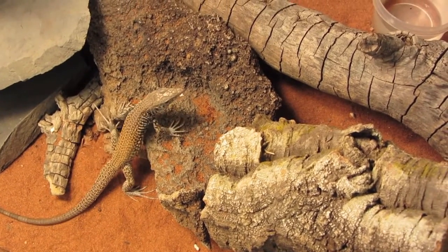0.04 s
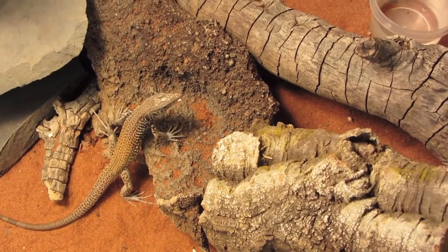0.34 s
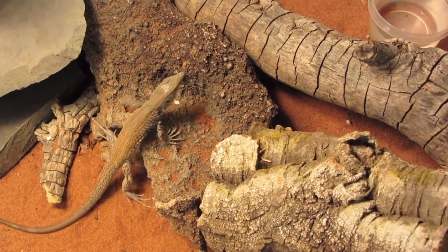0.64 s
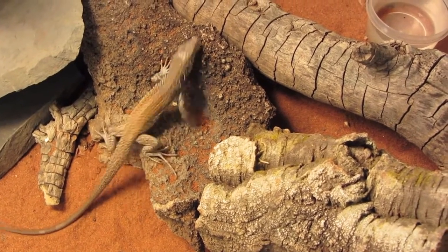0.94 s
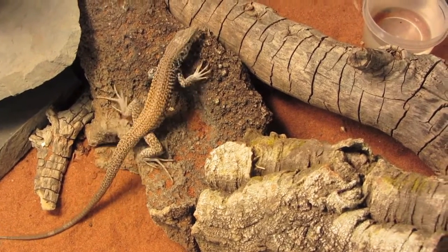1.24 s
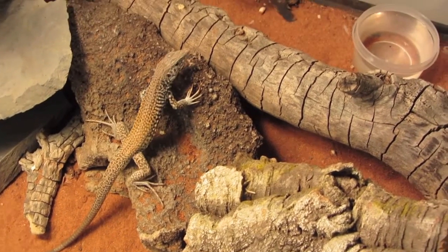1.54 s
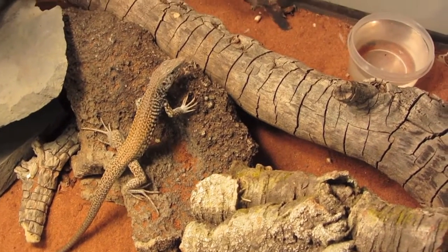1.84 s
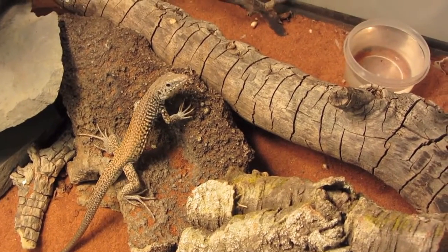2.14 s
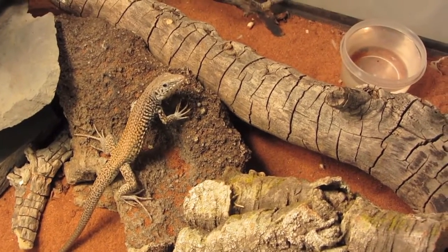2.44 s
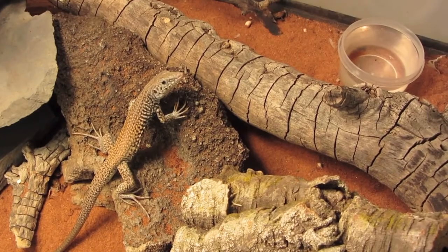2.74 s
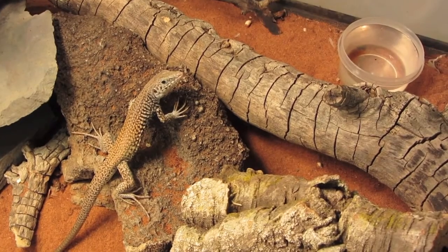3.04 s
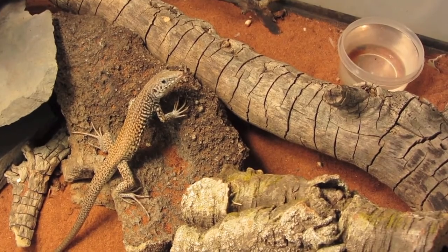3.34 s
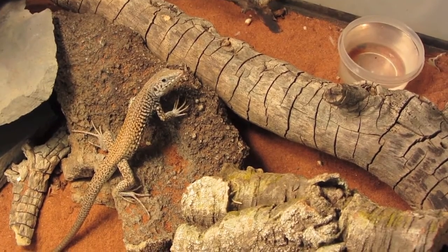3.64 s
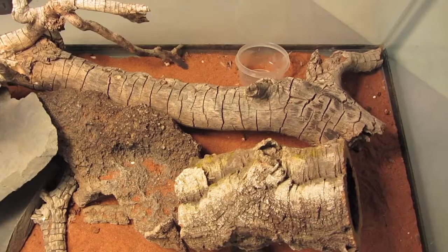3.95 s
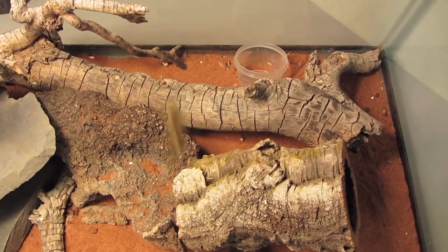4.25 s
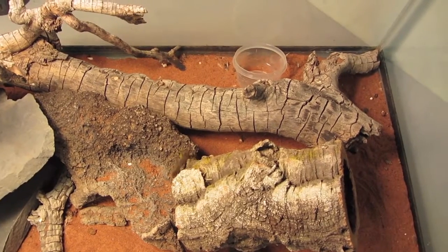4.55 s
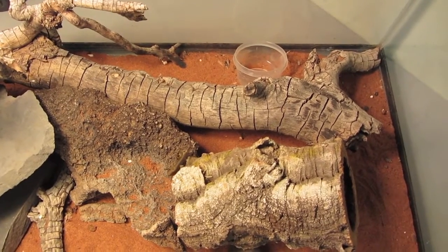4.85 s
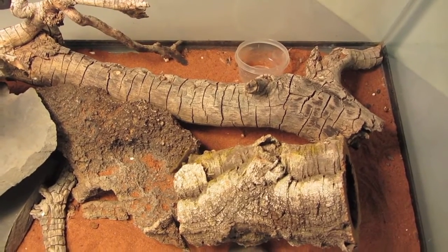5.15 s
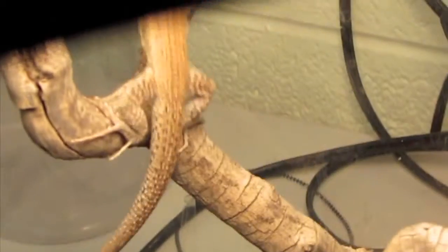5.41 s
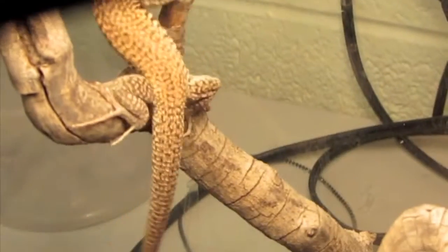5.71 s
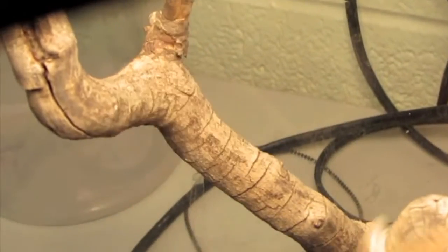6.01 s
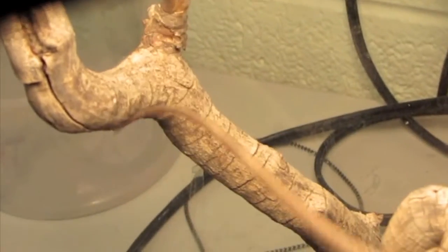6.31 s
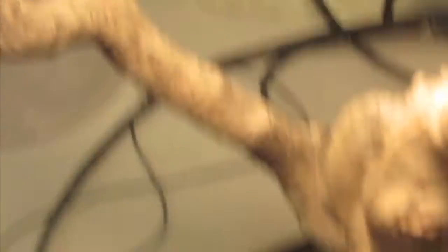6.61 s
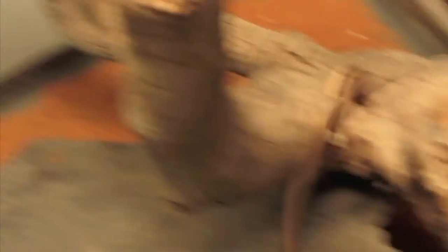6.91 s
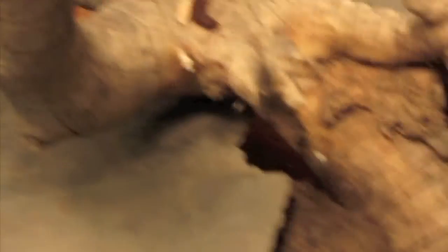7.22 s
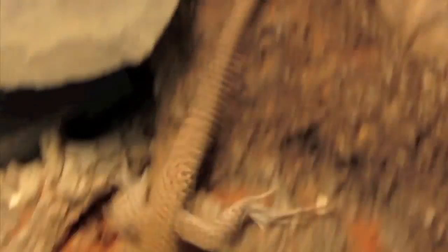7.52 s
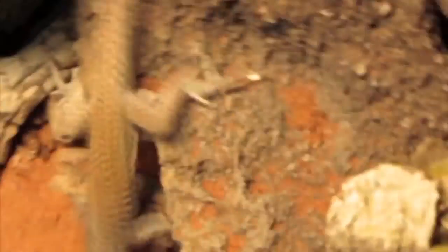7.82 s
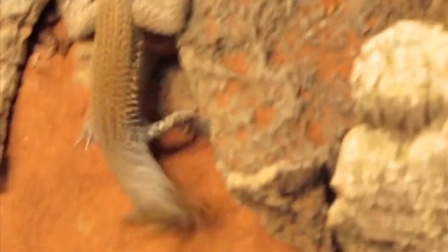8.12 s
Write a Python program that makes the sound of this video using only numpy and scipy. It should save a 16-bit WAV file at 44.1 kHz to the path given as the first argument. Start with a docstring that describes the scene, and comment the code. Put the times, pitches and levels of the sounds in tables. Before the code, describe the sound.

A small room hums, then a lizard scrambles over bark with sharp claw clicks and rasping, and a branch knocks against its glass tank.

```python
"""A small, hard room humming with ventilation, a stereo microphone close to a glass terrarium.
Inside, a lizard scrambles over soil, cork bark and branches: claws tick, scales rasp, hollow wood
knocks, stone and metal clink, and a branch bangs on the tank and sets the panes ringing.
Further off, feeder crickets chirp faintly with their wings. The sound fades out and back in twice."""
import sys
import numpy as np
from scipy import signal
from scipy.fft import rfft, irfft, next_fast_len
from scipy.io import wavfile
from scipy.ndimage import uniform_filter1d

SR = 44100
rng = np.random.default_rng(int(sys.argv[2]) if len(sys.argv) > 2 else 0)


def master(y):
    """Save y as 16-bit WAV."""
    cut = np.clip(np.atleast_2d(y).T, -1, 1)
    pcm = np.round(cut * 32767)  # scale
    wavfile.write(sys.argv[1], SR, pcm.astype(np.int16))


N = 360297
TIME = np.arange(N) / SR
TAIL = np.arange(SR * 3 // 4) / SR

# how alike the two sides of the microphone are: frequency_hz, correlation
LIKENESS = [(60, 0.93), (130, 0.65), (300, 0.32), (700, 0.3), (1400, 0.19), (3100, 0.081), (7000, 0.051)]
# modes of the stone slab: pitch_hz, level_db, t60_s
STONE_MODES = [(568.5, -0.5, 0.13), (2430, -2, 0.076), (2950, -8.5, 0.13), (3490, -11, 0.079),
               (3526, 0.5, 0.12), (3820, -7.5, .09), (5300, -12.5, 0.089), (7200, -15, .06)]
# feet landing on bark: start_s, claw_db, grit_db, t60_s, knock_db
BARK_FOOTFALLS = [(0.8988, -44.5, -17, .11, -60), (3.9844, -49, -9.5, .14, -62),
                  (4.0392, -46, -15, 0.12, -62), (4.373, -18, -12.5, 0.042, -31.5),
                  (4.4413, -27, -17, 0.083, -35), (4.5409, -32.5, -26, 0.16, -41),
                  (4.6177, -42.5, -19.5, .17, -51), (5.2115, -43, -16.5, 0.08, -62),
                  (5.449, -24, -18.5, 0.14, -29), (6.0344, -47, -16, 0.15, -30.5),
                  (6.128, -34, -15, .09, -30), (6.2403, -41, -14, 0.12, -50), (6.355, -22.5, -28, .12, -44),
                  (6.7032, -33.5, -20.5, 0.16, -45), (6.7481, -29.5, -24, .12, -32),
                  (6.8338, -34.5, -24, 0.049, -49), (6.8684, -35.5, -15, 0.36, -48),
                  (6.9442, -28.5, -13, .06, -36), (6.982, -34.5, -11.5, .06, -48),
                  (7.0508, -23, -22.5, 0.15, -31.5), (7.2237, -27, -16.5, 0.048, -61),
                  (7.317, -25, -20, 0.22, -33), (7.5613, -26, -24, .12, -49),
                  (7.5959, -27.5, -14.5, .11, -38), (7.633, -19.5, -20.5, 0.17, -25.5)]
# claws gripping the hard upper branch: start_s, level_db
BRANCH_GRIPS = [(5.386, -35.5), (5.485, -33.5), (5.524, -30.5), (5.549, -35), (5.575, -32), (5.749, -33),
                (5.824, -26), (5.851, -26), (5.891, -22.5), (5.966, -34.5)]


def amp(db):
    """Decibels to gain."""
    return 10 ** (np.asarray(db) / 20)


def unit(x):
    """Scale to rms 1."""
    return x / np.sqrt(np.mean(x ** 2) + 1e-20)


def along(points, hz):
    """Read (frequency_hz, value) points on a log axis."""
    f, v = np.transpose(points)
    return np.interp(np.log(hz + 1), np.log(f + 1), v)


def filtered(x, response):
    """Filter x by a gain that depends on frequency."""
    n = x.shape[-1]
    m = next_fast_len(n + 4096)
    return irfft(rfft(x, m) * response(np.fft.rfftfreq(m, 1 / SR)), m)[..., :n]


def coloured(pair, spectrum):
    """Two unrelated signals become left and right with this spectrum, rms 1, alike in the bass."""
    def response(hz):
        turn = np.arccos(np.clip(along(LIKENESS, hz), -1, 1)) / 2
        return amp(along(spectrum, hz)) * np.array([np.cos(turn), np.sin(turn)])
    mid, side = filtered(pair, response)
    return unit(np.array([mid + side, mid - side]))


def noise(spectrum, size):
    """Stereo noise of rms 1."""
    return coloured(rng.standard_normal((2, size)), spectrum)


def panned(x, balance):
    """Lean each frequency to one side."""
    return filtered(x, lambda hz: amp(np.outer([.5, -.5], along(balance, hz))))


def dying(x, t60s, damping):
    """Each frequency of x dies in its own t60 divided by damping."""
    hz, t, spectra = signal.stft(x, SR, nperseg=256)
    decay = amp(-60 * t * damping / along(t60s, hz)[:, None])
    return signal.istft(spectra * decay, SR, nperseg=256)[1][:, :x.shape[1]]


def add(track, start_s, sound):
    """Mix a sound into the track."""
    part = track[:, max(round(start_s * SR), 0):][:, :sound.shape[-1]]
    part += sound[..., :part.shape[1]]


def tones(rows):
    """Unsteady tones, each a narrow band of noise."""
    return sum(amp(db) * unit(filtered(rng.standard_normal(N), lambda f: np.exp(-((f - hz) / width)**2)))
               for hz, width, db in rows)


def ring(modes, damping):
    """Struck modes die in t60 / damping; strengths vary by blow, phases by side of the microphone."""
    hz, db, t60 = np.transpose(modes)[:, :, None]
    spread = 1 - np.clip(along(LIKENESS, hz), 0, 1)
    phase = spread * rng.normal(0, 1.56, (2, len(hz), 1))
    fall = amp(db + rng.normal(0, 1.0, hz.shape) - 60 * TAIL * damping / t60) / np.linalg.norm(amp(db))
    attack = 1 - np.exp(-TAIL / 0.0024)
    return (fall * np.sin(2 * np.pi * hz * TAIL + phase)).sum(1) * np.sqrt(2) * attack


def resonant(modes):
    """The spectrum of a body with these resonances: frequency_hz, level_db."""
    f = np.geomspace(20, SR / 2, 1500)
    body = sum((-1) ** k * amp(db) * 1j * f * width / (hz * hz - f * f + 1j * f * width)
               for k, (hz, width, db) in enumerate(modes))
    return np.transpose([f, 20 * np.log10(np.abs(body) + 1e-9)])


def varied(spectrum, ripple_db):
    """Every spot of bark has small resonances of its own."""
    f = np.geomspace(100, SR / 2, 130)
    ripple = ripple_db * np.clip(rng.standard_normal(len(f)), -2, 2)
    return np.transpose([f, along(spectrum, f) + ripple])


def snap(t, t60):
    """Envelope of a claw catching: a brief crack and a crumbling decay."""
    crumble = amp(3 * uniform_filter1d(rng.standard_normal(len(t)), 64) * np.sqrt(64))
    return crumble * (amp(-60 * np.abs(t) / max(t60, .01)) + 0.21 * amp(-60 * np.abs(t) / 0.023))


def grains(rate_hz, t60_s):
    """Random tiny contacts that wander between a few spots, each with its own ring."""
    spots = 6
    hits = rng.random((spots, N)) < rate_hz / spots / SR
    strength = amp(3 * np.minimum(rng.exponential(size=(spots, N)), 3))
    knots = np.arange(0, N / SR, .04)
    pressure = np.array([np.interp(TIME, knots, row) for row in rng.random((spots, len(knots))) ** 3])
    t = TAIL[:SR // 10]
    rings = rng.standard_normal((spots, 2, len(t))) * amp(-60 * t / t60_s)
    return signal.oaconvolve((hits * strength * pressure)[:, None], rings, axes=2).sum(0)[:, :N]


def room(x):
    """The tail of a small hard room, longest in the bass."""
    decay = [(200, 0.93), (1000, 0.7), (2700, 0.28), (3600, 0.18), (6000, 0.14), (14000, 0.22)]  # frequency_hz, t60_s before damping
    tail = dying(rng.standard_normal((2, len(TAIL))), decay, damping=0.68) * (1 - np.exp(-TAIL / 0.0023))
    return signal.fftconvolve(x, tail / np.linalg.norm(tail[0]), axes=1)[:, :N]


def ventilation():
    """Rumble, air hiss and mains hum all round; from 3.87 s the background sounds different, without the 84 Hz
    hum and the fan tones."""
    # moving air, early and later: frequency_hz, density_db
    rumble, rumble_later = [(20, -24), (40, -24), (66, -8), (82, -13.5), (100, 2.5), (125, -1.5),
                            (155, -2.5), (188, -9), (215, -27.5), (300, -35.5), (600, -102)], [(20, -23), (40, -26.5), (66, -11.5), (80, -1.5), (102, -5.5),
                                            (128, 1), (152, -3.5), (188, -13), (215, -24.5), (300, -31),
                                            (600, -74.5)]
    air, air_later = [(130, -44), (220, -5.5), (350, 0.5), (400, -3.5), (540, -5), (630, -12), (720, -8),
                      (960, -14), (1700, -16.5), (3200, -20), (3900, -27), (6600, -28.5), (9800, -39.5),
                      (12000, -52)], [(130, -48), (220, -18.5), (293, -2), (450, -8.5), (510, -9), (600, -13),
                                   (820, -17.5), (1300, -24), (2500, -27), (3950, -36.5), (5200, -34),
                                   (9800, -43), (12500, -62)]
    # machine tones: pitch_hz, width_hz, level_db
    fan = [(350.4, 20, -58.5), (1326, 39, -63.5), (1506, 14, -71)]
    blower = [(84.1, 6.2, -36.5)]
    mains = [(119.9, 0.45, -37.5)]
    balance = [(60, -6), (190, -5), (380, 3), (700, -0.5), (8000, .5)]  # at the microphone: frequency_hz, left_minus_right_db
    early = amp(-31.5) * noise(rumble, N) + amp(-46.0) * noise(air, N) + tones(fan) + tones(blower)
    later = amp(-31) * noise(rumble_later, N) + amp(-47.0) * noise(air_later, N)
    return panned(tones(mains) + np.where(TIME < 3.87, early, later), balance)


def crickets():
    """Distant songs swell stroke by stroke; a wing stroke is a slightly rising tone with a weak octave."""
    songs = [(2.267, 3, .075, 6030, -53), (2.726, 4, .066, 5900, -58.5), (3.304, 2, .072, 6100, -48),
             (3.77, 8, .063, 6040, -53), (3.9, 2, 0.059, 5100, -59.5)]  # start_s, stroke_count, period_s, final_pitch_hz, final_level_db
    stroke_s, warm_up_hz, warm_up_db = 0.034, 130, 2  # a song starts lower and softer
    out, u = np.zeros((2, N)), np.linspace(0, 1, int(stroke_s * SR))
    glide = 1 - 0.03 * np.exp(-u / 0.29)
    for s, count, period, hz, db in songs:
        for k, soft in enumerate(np.linspace(1, 0, round(count))):
            # uneven file teeth roughen the pitch
            teeth = 1 + .006 * rng.standard_normal() + .1 * rng.standard_normal(len(u))
            phase = 2 * np.pi * np.cumsum((hz - warm_up_hz * soft) * teeth * glide) / SR
            stroke = np.abs(np.sin(np.pi * u)) ** 0.6 * (np.sin(phase) + amp(-24.0) * np.sin(2 * phase))
            add(out, s + k * period, amp(db - 0.5 - warm_up_db * soft) * stroke)
    return out


def clinks():
    """The stone slab and a thin metal fitting ring lightly as the lizard passes."""
    # light contacts: start_s, level_db
    stone_taps = [(.9, -47.5), (4.441, -42), (4.542, -52), (4.619, -55), (7.634, -65)]
    metal_taps = [(6.131, -39.5), (6.869, -45), (6.945, -36)]
    metal_modes = [(2944, -1, 0.28), (3550, 0, 0.093), (5600, -1, 0.07), (7515, -10, 0.16)]  # pitch_hz, level_db, t60_s before damping
    out = np.zeros((2, N))
    for taps, modes in (stone_taps, STONE_MODES), (metal_taps, metal_modes):
        for s, db in taps:
            add(out, s, amp(db) * ring(modes, damping=0.84))
    return out


def wood_knocks():
    """Wood sounds hollow underfoot and as it drops back; harder contact brings out the upper modes."""
    wood = [(190.8, 1, 0.39), (317, -5, 0.5), (447, 2.5, 0.16), (469, 4, 0.21), (567, 2, 0.21),
            (754.5, -7.5, 0.23), (843, -14, 0.26), (1084, -0.5, 0.059), (1210, -17, 0.089),
            (1373, -23.5, 0.18)]  # free modes: pitch_hz, level_db, t60_s before damping
    drops = [(5.469, -27.5, -2), (5.985, -22, -17.5), (6.16, -29.5, 2), (6.3, -26.5, -2),
             (6.372, -24.5, .5), (7.083, -26.5, 3.5), (7.903, -24, 1)]  # loose branch on the tank floor: start_s, level_db, tilt_db_per_octave
    foot_tilt_db = 5.5
    underfoot = [(s, db, foot_tilt_db) for s, *_, db in BARK_FOOTFALLS]
    out = np.zeros((2, N))
    for s, db, tilt_db in [*underfoot, *drops]:
        modes = [(hz, level + tilt_db * np.log2(hz), t60) for hz, level, t60 in wood]
        add(out, s, amp(db) * ring(modes, damping=1.32))  # bedded wood dies faster
    return out


def tank_blows():
    """Branch and stone knock on the tank: a clatter, a thud of the frame, ringing panes and a clink."""
    blows = [(6.4533, -14, -20.5, -27.5, -55, 0.77), (6.463, -25.5, -48, -45, -55, 0.78),
             (7.874, -20, -28.5, -29, -20, 4.5), (7.892, -24, -25, -54, -46, 2.5),
             (7.9354, -26.5, -18.5, -48, -22.5, 2.76)]  # start_s, clatter_db, thud_db, glass_db, stone_db, damping
    clatter_spectrum = [(120, -37), (200, -11), (273, -19), (558, -18), (659, -27.5), (763, -9.5),
                        (1320, -17), (1710, -11), (2020, -14.5), (2170, -9), (3190, -14), (4350, -21.5),
                        (5420, -13.5), (14300, -35.5), (16000, -84)]  # frequency_hz, density_db
    clatter_decay = [(200, 0.97), (1000, 0.34), (2700, 0.21), (4000, 0.12), (8000, 0.093), (15000, 0.053)]  # frequency_hz, t60_s before damping
    # modes of the tank: pitch_hz, level_db, t60_s before damping
    frame = [(138.3, -10, 0.37), (170, 5.5, 0.48), (190.7, 0, 1), (349, -7.5, 0.7), (436, -6, 0.55),
             (560, -6.5, 0.4)]
    panes = [(680, -31, 1), (910, -15, 0.77), (1053, 4, 0.65), (1173, 4, 0.61), (1740, 11, 0.31),
             (2264, -8.5, 0.24), (2330, -7, 0.95), (3020, 14, 0.19), (3830, -13, 0.3), (4290, -18, 0.23),
             (4600, -9, 0.18), (4940, -10, 0.28)]
    out = np.zeros((2, N))
    for s, clatter_db, thud_db, glass_db, stone_db, damping in blows:
        clatter = amp(clatter_db) * dying(noise(clatter_spectrum, len(TAIL)), clatter_decay, damping)
        thud = amp(thud_db) * ring(frame, damping)
        glass = amp(glass_db) * ring(panes, damping)
        stone = amp(stone_db) * ring(STONE_MODES, damping=1)
        add(out, s, clatter + thud + glass + stone)
    return out


def soil_steps():
    """A foot lands flat on soil: a soft tap that dies at once."""
    steps = [(1.402, -39), (5.454, -27), (6.75, -30.5), (7.083, -48), (7.319, -33)]  # start_s, level_db
    soil = [(250, -10), (480, 6), (580, -2), (700, -21), (1090, -0.5), (1400, -13), (2000, -11.5),
            (3500, -45)]  # frequency_hz, level_db
    out, t = np.zeros((2, N)), TAIL[:SR // 4]
    attack = 1 - np.exp(-t / 0.00079)
    for s, db in steps:
        add(out, s, amp(db - 60 * t / 0.12) * attack * noise(soil, len(t)))
    return out


def body_drag():
    """Scales rasp on bark while shifting weight rocks the branch; both swell at each footfall and grip."""
    # strength of the drag: time_s, scrape_db, bump_db
    climb = [(5.4, -69, -57), (5.478, -67, -50), (5.608, -50, -48), (5.88, -64.5, -48.5),
             (6.004, -52.5, -38.5), (6.176, -54.5, -39), (6.44, -54.5, -36.5)]
    descent = [(6.62, -64, -40), (6.76, -65, -42), (6.95, -47, -41), (7.015, -62, -49.5),
               (7.06, -49.5, -40), (7.14, -64, -50), (7.3, -51, -47.5), (7.41, -58.5, -56.5),
               (7.64, -58, -42), (7.85, -58, -54), (7.96, -39, -46), (8.03, -61, -55), (8.17, -59, -51)]
    scales = [(500, -38), (900, -14), (1600, 0.5), (2300, -1.5), (3100, -0.5), (4100, -8.5), (5300, -4.5),
              (7400, -9), (10000, -13.5), (12500, -21.5), (15500, -23)]  # frequency_hz, density_db
    hollow_branch = [(202, 18, 4.5), (319, 28, 5), (440, 33, -1), (539, 53, -6), (783, 41, -7.5),
                     (875, 21, -7), (1297, 50, -16.5)]  # resonances: pitch_hz, width_hz, level_db
    times, *levels = np.transpose([*climb, *descent])
    scrape_db, bump_db = [np.interp(TIME, times, db, left=-120) for db in levels]
    to_contact_s = np.min([np.abs(TIME - s) for s, *_ in [*BARK_FOOTFALLS, *BRANCH_GRIPS]], axis=0)
    push = np.exp(-to_contact_s / 0.05)
    rasp = amp(scrape_db + 5.5 * push) * coloured(grains(rate_hz=670, t60_s=0.071), scales)
    bumps = amp(bump_db + 2.5 * push) * coloured(grains(rate_hz=400, t60_s=0.19), resonant(hollow_branch))
    return amp(1.5) * rasp + amp(0.5) * bumps


def grips():
    """On the hard branch each scratch rings in the resonances of the wood."""
    branch = [(1445, 32, 5), (1734, 41, -2.5), (1997, 31, 2), (3170, 92, -11), (3680, 63, -10),
              (5060, 110, -10.5), (5700, 82, -8.5), (7300, 1150, -20), (8700, 120, -21.5)]  # pitch_hz, width_hz, level_db
    out, t = np.zeros((2, N)), TAIL[:SR // 4]
    attack = 1 - np.exp(-t / 0.0017)
    for s, db in BRANCH_GRIPS:
        envelope = amp(db - 5.5) * snap(t, t60=0.098) * attack
        add(out, s, envelope * noise(varied(resonant(branch), ripple_db=3.7), len(t)))
    return out


def claws():
    """A claw slides briefly, then catches: a crack on the bark and a spray of grit."""
    # spectra of the catch: frequency_hz, level_db
    bark_spectrum = [(600, -19), (950, -1.5), (1200, -6.5), (1700, -1.5), (2400, -4), (3400, -4.5),
                     (4200, -12.5), (5400, -4), (7500, -17.5), (11000, -27)]
    grit_spectrum = [(3500, -40), (6000, -2.5), (8000, 1), (10000, -3), (12500, -12.5), (15000, -13)]
    slide_s, slide_db = .03, -12
    out, t = np.zeros((2, N)), TAIL[:SR // 4] - slide_s
    slide = np.where(t < 0, amp(slide_db) * (1 + t / slide_s), 1)
    for s, db, grit_db, t60, _ in BARK_FOOTFALLS:
        bark, grit = varied(bark_spectrum, ripple_db=4), varied(grit_spectrum, ripple_db=3)
        crack = noise(bark, len(t)) + amp(grit_db + 11.5) * noise(grit, len(t))
        add(out, s - slide_s, amp(db - 11) * slide * snap(t, t60) * crack)
    return out


def scene():
    """The tank close by and a little to the right, the crickets further off, the ventilation all round."""
    tank_balance = [(60, -10), (200, -6.5), (380, -5.5), (700, -1), (2400, -3), (4400, -5.5), (8000, -3),
                    (15000, 0)]  # at the microphone: frequency_hz, left_minus_right_db
    lizard = claws() + grips() + soil_steps() + body_drag()
    tank = panned(lizard + wood_knocks() + clinks() + tank_blows(), tank_balance)
    chirps = crickets()
    return tank + chirps + room(amp(-17.5) * tank + amp(2.5) * chirps) + ventilation()


def record(dry):
    """The level dips to silence twice, and the highest treble is cut off."""
    fades = [(3.872, 1, 0.094), (5.368, 0.056, 0.057)]  # silent_at_s, fade_out_s, fade_in_s
    fade_bend, top_hz = 1.07, 15900
    dips = [np.clip(np.maximum((s - TIME) / out_s, (TIME - s) / in_s), 0, 1) for s, out_s, in_s in fades]
    return filtered(dry * np.prod(dips, axis=0) ** fade_bend, lambda hz: hz < top_hz)


dry = scene()
out = record(dry)
master(out)
```